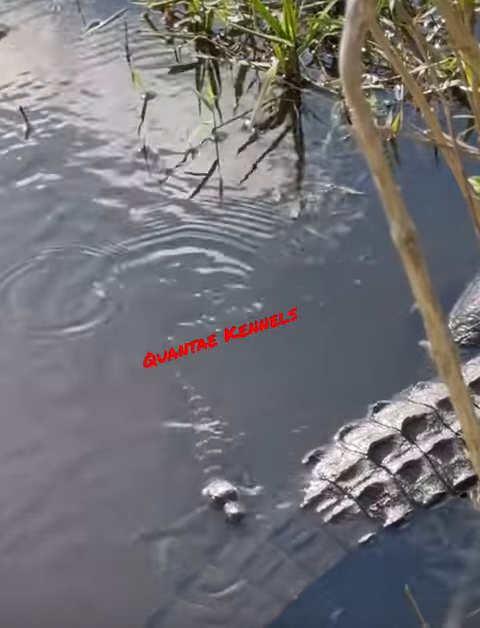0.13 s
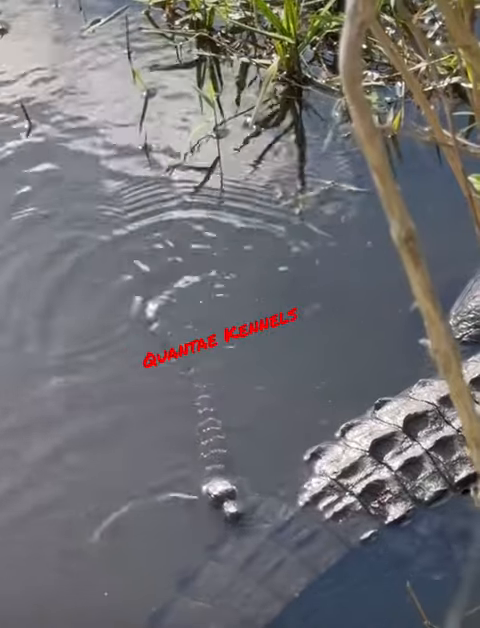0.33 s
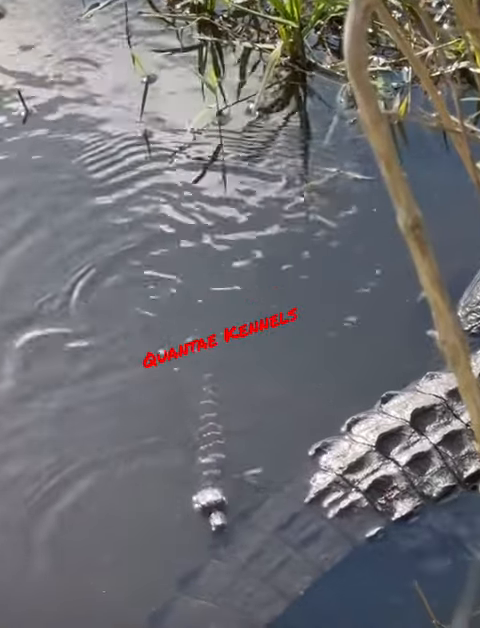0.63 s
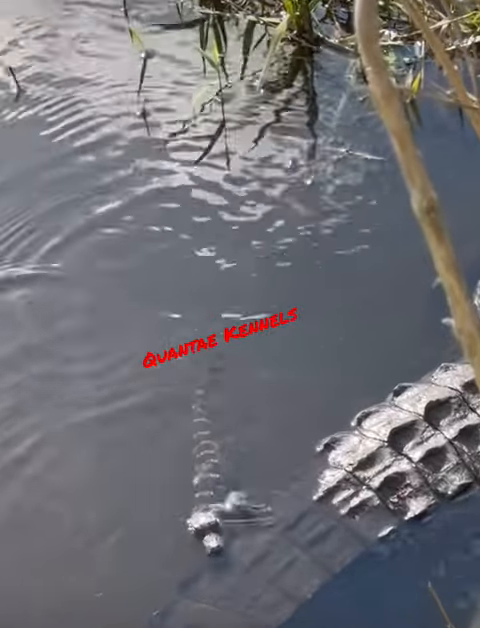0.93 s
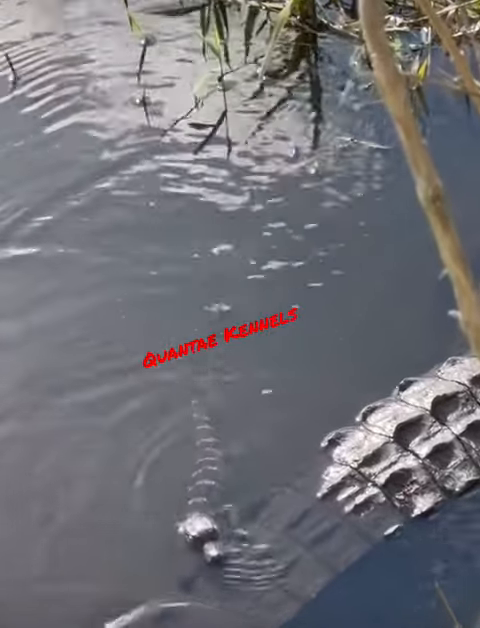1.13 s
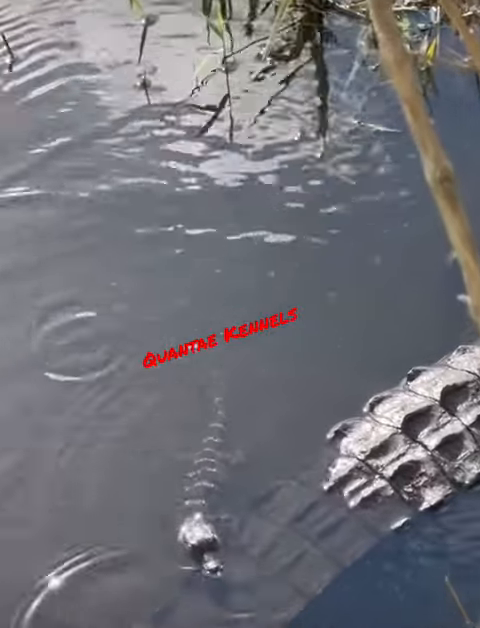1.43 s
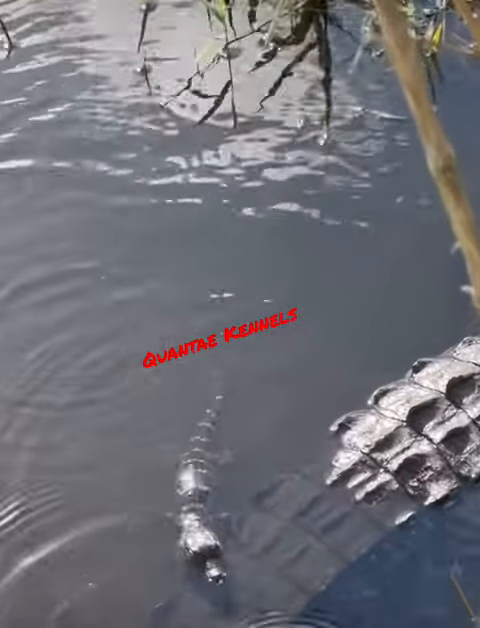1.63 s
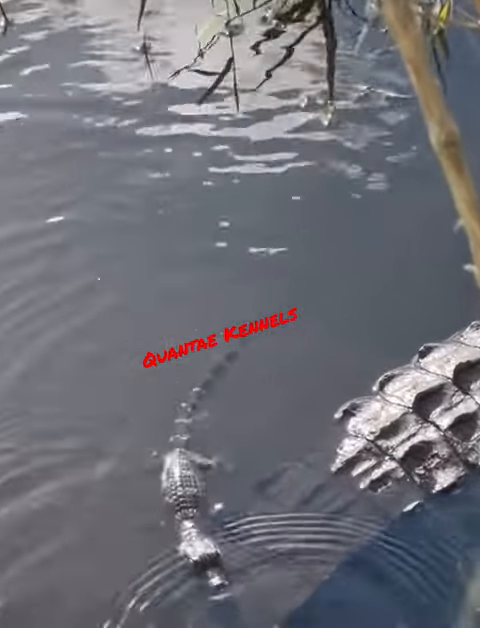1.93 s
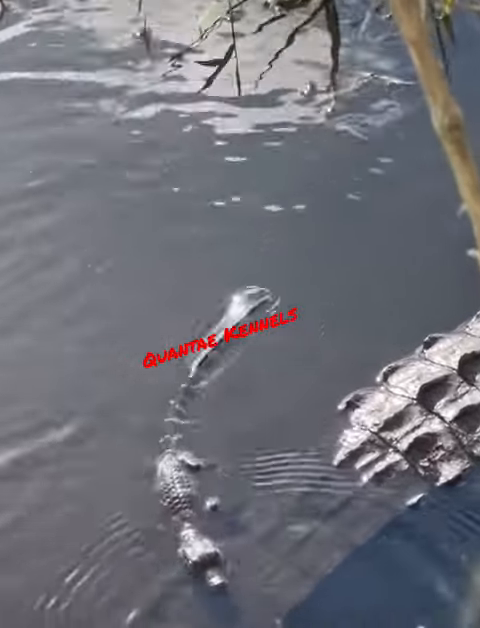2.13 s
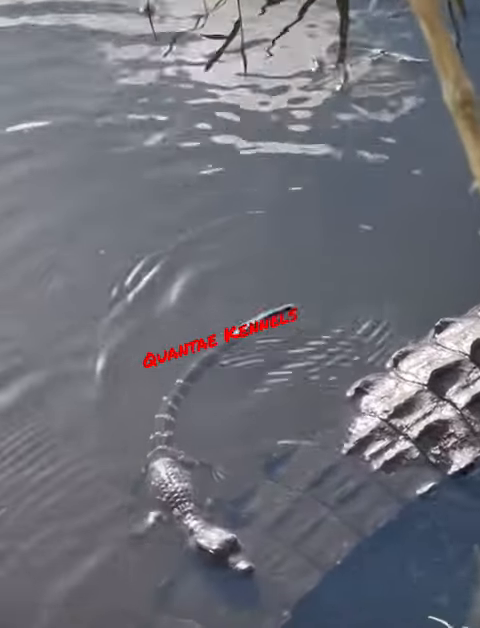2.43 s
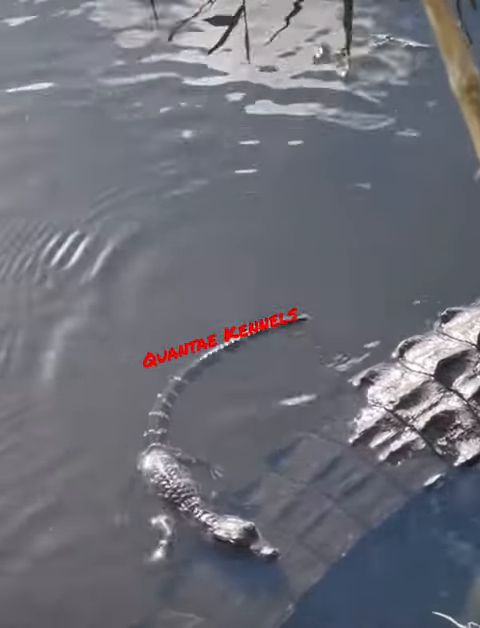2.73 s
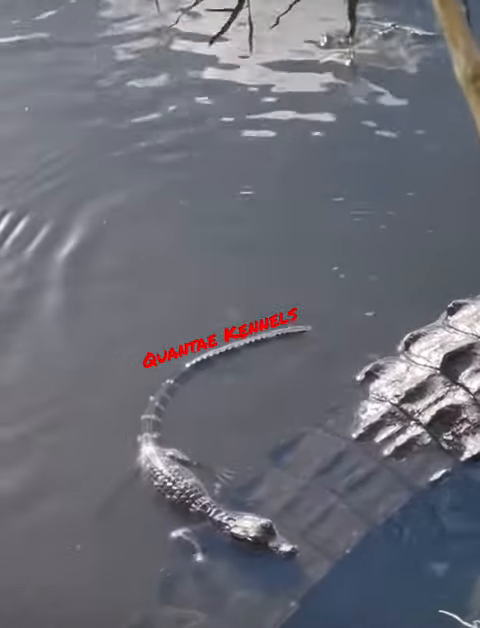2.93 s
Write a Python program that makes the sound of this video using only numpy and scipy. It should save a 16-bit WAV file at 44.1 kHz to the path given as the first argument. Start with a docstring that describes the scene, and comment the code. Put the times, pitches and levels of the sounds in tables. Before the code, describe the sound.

A deep steady rumble like far traffic or wind hangs over quiet pond water.

```python
"""Pond near a road

Deep steady rumble of far traffic and machinery (coloured noise) with a faint wavering motor hum (sines).
Drone, whirr and thin whine are narrow noise; water trickles and ticks close by (ringing bubbles, drips).
A small animal gives one short low peep, an insect a thin high squeak (gliding sines); thin high hiss on top.
A phone with two close microphone ports picks it up; the sound sets in after a short silence.
"""
import sys
import numpy as np
from scipy import signal
from scipy.fft import rfft, irfft
from scipy.io import wavfile

SR = 44100
rng = np.random.default_rng(int(sys.argv[2]) if len(sys.argv) > 2 else 0)


def undo_db(level):
    """Turn decibels back into plain size, where 20 dB means ten times bigger."""
    steps = np.asarray(level, float) / 20
    return 10 ** steps


def generate_wav(signal):
    """Clip the signal to [-1, 1] and save it as 16-bit WAV at the path in sys.argv[1]."""
    frames = np.transpose(np.atleast_2d(signal))
    scaled = np.clip(frames, -1, 1) * 32767
    pcm = np.round(scaled).astype(np.int16)
    wavfile.write(sys.argv[1], SR, pcm)


N = 136269


def rms_one(x):
    """Scale to rms 1."""
    return x / np.sqrt(np.mean(x ** 2) + 1e-20)


def in_time(rows):
    """Interpolate a (t/s, value) table at every sample."""
    t_s, value = np.transpose(rows)
    return np.interp(np.arange(N) / SR, t_s, value)


def drift(rate_hz):
    """Slow random signal, spread 1: noise through two equal poles, run at SR / 40."""
    pole = np.exp(-80 * np.pi * rate_hz / SR)
    noise = rng.standard_normal(N // 40 + 2002)
    slow = signal.lfilter([1], [1, -2 * pole, pole * pole], noise)[2000:]  # settled part
    return np.interp(np.arange(N) / 40, np.arange(len(slow)), rms_one(slow))


def ring(clicks, hz, t60_s):
    """Two-pole resonance: a unit click starts a decaying sine of height 1."""
    radius = undo_db(-60 / (t60_s * SR))
    angle = 2 * np.pi * hz / SR
    poles = [1, -2 * radius * np.cos(angle), radius * radius]
    return signal.lfilter([0, np.sin(angle)], poles, clicks + 1e-18)


def ring_twice(clicks, hz, t60_s):
    """Two equal resonances in series: softer onset, narrower band."""
    return ring(ring(clicks, hz, t60_s), hz, t60_s)


def coloured(spectrum, patchy_db):
    """Noise shaped by a spectrum, its half-octave bands flickering partly together; rms 1."""
    hz = np.maximum(np.arange(N // 2 + 1) * SR / N, 1)
    points_hz, points_db = np.transpose(spectrum)
    gain_db = np.interp(np.log(hz), np.log(points_hz), points_db)
    full = rfft(rng.standard_normal(N)) * undo_db(gain_db)
    place = 2 * np.log2(hz / 20)  # half octaves above 20 Hz
    together = drift(5.4)
    out = np.zeros(N)
    for k in range(21):
        share = np.clip(1 - abs(place - k), 0, 1)
        flicker_db = patchy_db * (1.05 * together + drift(21.0))
        out += irfft(full * share, N) * undo_db(flicker_db)
    return rms_one(out)


def narrow(hz, one_pass_width_hz):
    """Noise twice through one resonance; rms 1."""
    t60_s = np.log(1000) / (np.pi * one_pass_width_hz)
    return rms_one(ring_twice(rng.standard_normal(N), hz, t60_s))


def glides(rows):
    """Short sines of gliding pitch under a Hann swell."""
    out = np.zeros(N)
    for t_s, length_s, peak_db, start_hz, end_hz in rows:
        n, i = int(length_s * SR), int(t_s * SR)
        phase = 2 * np.pi * np.cumsum(np.linspace(start_hz, end_hz, n)) / SR
        out[i:i + n] += undo_db(peak_db) * np.hanning(n) * np.sin(phase)
    return out


# rumble spectrum, common to both ports: [f/Hz, relative density/dB]
RUMBLE_SPECTRUM = [(15, -50), (25, -25.5), (33, -21), (45, -3.5), (65, 1), (100, -2), (170, -4.5),
                   (230, -10), (330, -14), (439, -19), (528, -25), (620, -24.5), (700, -29.5),
                   (1140, -37.5), (1900, -49), (2600, -71.5), (4000, -82)]
# rumble rms ahead of the upper swell: [t/s, level/dB]
RUMBLE_LEVEL = [(0.1, -12), (0.48, -16.5), (0.7, -12.5), (1.2, -14.5), (1.26, -15.5), (1.32, -13),
                (2.98, -14), (3.05, -16)]
# extra gain of the rumble above the split: [t/s, level/dB]
UPPER_SWELL = [(0, -2), (.25, 0.5), (.5, 1.5), (.8, -1.5), (1.15, 1), (1.35, -1.5), (1.6, 0), (2.0, 1),
               (2.15, 1), (2.3, -1), (2.45, 0.5), (2.7, 0.5), (2.8, -0.5), (3.09, 1)]


def rumble():
    """Far traffic and machinery: coloured noise whose upper part swells on its own."""
    split_hz = 129
    noise = coloured(RUMBLE_SPECTRUM, patchy_db=.5)
    low = signal.sosfiltfilt(signal.butter(2, split_hz, fs=SR, output="sos"), noise)
    upper = noise - low
    return undo_db(in_time(RUMBLE_LEVEL)) * (low + undo_db(in_time(UPPER_SWELL)) * upper)


# low noise that differs between the ports: [f/Hz, relative density/dB]
APART_SPECTRUM = [(24, -20.5), (40, -8.5), (60, -3), (128, -11.5), (204, -3.5), (390, -4), (444, -5),
                  (548, -0.5), (1310, -17.5), (1540, -37), (1900, -59.5), (4180, -83)]


def rumble_apart():
    """Patchy low coloured noise, to be taken with opposite sign in the two ports."""
    level_db = -38
    return undo_db(level_db) * coloured(APART_SPECTRUM, patchy_db=2.0)


# motor harmonics: [multiple of the base pitch, rms level/dB ahead of waver and swell]
HUM_HARMONICS = [(2, -40.5), (4, -59), (5, -61), (6, -64), (7, -71), (8, -69)]
# common gain of the harmonics: [t/s, level/dB]
HUM_SWELL = [(0, 4.5), (.65, 4.5), (.8, -3), (1.05, 2), (1.15, -4), (1.6, -2), (2.0, -2), (2.2, -5),
             (2.35, 1), (2.48, 5), (2.65, 1), (2.77, -4), (2.85, 4), (2.92, -3), (3.09, 0)]


def hum():
    """Motor: multiples of one drifting pitch, each wavering in strength."""
    base_hz, pitch_spread_hz, waver_db = 293.8, .8, 2.5
    phase = 2 * np.pi * np.cumsum(base_hz + pitch_spread_hz * drift(3.05)) / SR
    out = np.zeros(N)
    for multiple, level_db in HUM_HARMONICS:
        height = np.sqrt(2) * undo_db(level_db + waver_db * drift(12.0))
        out += height * np.sin(round(multiple) * phase + rng.uniform(0, 2 * np.pi))
    return undo_db(in_time(HUM_SWELL)) * out


# passing drone: [t/s, level/dB]
DRONE_LEVEL = [(0, -19.5), (.6, -22.5), (.95, -24.5), (1.05, -34.5), (3.09, -31)]


def drone():
    """Passing drone: a narrow noise band of fixed pitch under a level curve."""
    return undo_db(in_time(DRONE_LEVEL)) * narrow(212.47, one_pass_width_hz=4.65)


# swelling whirr, common part: [t/s, level/dB]
WHIRR_LEVEL = [(0, -24.5), (.2, -43.5), (.6, -47), (.75, -26.5), (1.0, -56), (1.3, -27), (1.6, -46.5),
               (1.95, -27), (2.6, -29.5), (2.9, -54)]


def whirr():
    """Swelling band noise: a common part and an independent, weaker part that differs by port."""
    centre_hz, one_pass_width_hz, apart_db = 440, 90, -8
    gain = undo_db(in_time(WHIRR_LEVEL))
    common = gain * narrow(centre_hz, one_pass_width_hz)
    apart = undo_db(apart_db) * gain * narrow(centre_hz, one_pass_width_hz)
    return common, apart


# stir of the water; bubbles and wash scale its swing: [t/s, level/dB]
TRICKLE_STIR = [(0, -49), (.9, -49), (.97, -46.5), (1.05, -49), (1.3, -48), (1.4, -48.5), (1.55, -48.5),
                (1.7, -48.5), (1.9, -47.5), (2.0, -48), (2.1, -47.5), (2.45, -47), (2.65, -48), (2.72, -48),
                (2.82, -46), (2.9, -49), (3.0, -48.5), (3.09, -48.5)]
# two sizes of bubble: [low f/Hz, high f/Hz, relative level/dB]
BUBBLE_PITCHES = [(2400, 3700, 0), (3950, 5000, -6)]
# fine wash of water and air: [f/Hz, relative density/dB]
WASH_SPECTRUM = [(1200, -30.5), (2000, 6), (2700, -5.5), (3600, -14.5), (4500, -13), (6000, -8),
                 (7500, -12), (8200, -16.5), (9600, -14), (10500, -24.5), (11000, -48), (15400, -68)]


def trickle():
    """Tiny ringing bubbles at random over a fine wash; both grow as the water stirs."""
    bubbles_per_s, t60_cycles, patchy_db = 5000, 16, 3.0  # t60 of one of two resonances
    bubbles_under_db, bubbles_follow = -5, 2.5
    wash_db, wash_follows = -53.5, 0.55
    level_db = in_time(TRICKLE_STIR)
    mean_db = level_db.mean()
    stir_db = level_db - mean_db

    sizes = undo_db(2.2 * np.minimum(rng.exponential(1, N), 4)) * rng.choice([-1, 1], N)
    born = rng.random(N) < bubbles_per_s / SR
    pitches = [(hz, db) for low, high, db in BUBBLE_PITCHES for hz in np.geomspace(low, high, num=8)]
    dealt = rng.integers(0, 16, N)  # pitch index of each bubble
    rings = np.zeros(N)
    for k, (hz, db) in enumerate(pitches):
        voice = rms_one(ring_twice(sizes * born * (dealt == k), hz, t60_cycles / hz))
        rings += undo_db(db + patchy_db * drift(11)) * voice

    bubbles = undo_db(mean_db + bubbles_under_db + bubbles_follow * stir_db) * rms_one(rings)
    wash = undo_db(wash_db + wash_follows * stir_db) * coloured(WASH_SPECTRUM, patchy_db=.7)
    return bubbles + wash


# small drips: [t/s, nominal peak level/dB, f/Hz, t60/s]
DRIPS = [(.385, -59, 6500, .003), (.470, -47.5, 2620, .014), (.958, -49, 2700, .003),
         (.958, -59, 4800, .002), (1.895, -50, 2450, .005), (2.085, -56, 4300, .005),
         (2.610, -54, 4500, .008), (2.945, -57, 4900, .008)]


def drips():
    """Each drip is a short burst of random touches into one ringing pitch."""
    burst_s = .018
    n = int(burst_s * SR)
    out = np.zeros(N)
    touches = rng.standard_normal((len(DRIPS), 2000))
    for (t_s, level_db, hz, t60_s), burst in zip(DRIPS, touches):
        i = int(t_s * SR)
        build_up = np.sqrt(min(n / 4, t60_s * SR / 40))  # touches that add up in the ring
        clicks = np.zeros(N)
        clicks[i:i + n] = undo_db(level_db) * burst[:n] * np.hanning(n) / build_up
        out += ring(clicks, hz, t60_s)
    return out


# small animal: [t/s, length/s, peak level/dB, start f/Hz, end f/Hz]
PEEP = [(2.081, .04, -17, 435, 410)]


def peep():
    """One short low sine, falling slightly."""
    return glides(PEEP)


# insect, part that differs by port: [t/s, length/s, peak level/dB, start f/Hz, end f/Hz]
SQUEAK = [(2.348, .045, -63, 10650, 10450), (2.424, .008, -56, 10800, 11600)]


def squeak():
    """Two thin high glides; the common part is a weaker copy of the part that differs by port."""
    common_under_db = -8
    apart = glides(SQUEAK)
    return undo_db(common_under_db) * apart, apart


def whine():
    """Faint steady whine: a very narrow noise band."""
    level_db = -73
    return undo_db(level_db) * narrow(4469, one_pass_width_hz=10)


# thin high hiss at the very top: [f/Hz, relative density/dB]
THIN_HISS_SPECTRUM = [(13000, -40), (13500, -5), (14200, 0), (14450, -3), (14700, -14), (15300, -40)]
# its rms: [t/s, level/dB]
THIN_HISS_LEVEL = [(0, -89), (1.25, -87), (1.4, -79), (1.9, -79), (2.05, -86), (2.3, -77), (2.6, -78),
                   (3.09, -80)]


def thin_hiss():
    """High noise band under a level curve."""
    return undo_db(in_time(THIN_HISS_LEVEL)) * coloured(THIN_HISS_SPECTRUM, patchy_db=3.0)


# microphone hiss: [f/Hz, relative density/dB]
HISS_SPECTRUM = [(4600, -47), (5200, -18), (6250, -4.5), (7350, -3), (8670, -5), (9200, -4), (9550, 1.5),
                 (10100, -4), (11800, -1), (13200, 0), (14300, -4), (15100, -9), (15300, -60)]


def hiss():
    """Microphone hiss, to be taken with opposite sign in the two ports."""
    level_db = -59.5
    return undo_db(level_db) * coloured(HISS_SPECTRUM, patchy_db=1.2)


# port imbalance: [f/Hz, left minus right level/dB, left lead/rad]
PORTS = [(140, 0, 0), (250, 0.7, 0.15), (500, 1.6, .2), (650, 0, .25), (900, -4, .3), (1250, -1, .3),
         (1600, 0, 0)]


def lean(mid):
    """Side signal that gives the common sound a left/right ratio in level and phase by pitch."""
    points_hz, points_db, points_lead_rad = np.transpose(PORTS)
    hz = np.arange(N // 2 + 1) * SR / N
    level_db = np.interp(hz, points_hz, points_db)
    lead_rad = np.interp(hz, points_hz, points_lead_rad)
    ratio = undo_db(level_db) * np.exp(1j * lead_rad)
    return irfft(rfft(mid) * (ratio - 1) / (ratio + 1), N)


def scene():
    """What both ports share, plus and minus what differs."""
    whirr_common, whirr_apart = whirr()
    squeak_common, squeak_apart = squeak()
    mid = rumble() + hum() + drone() + whirr_common
    mid += trickle() + drips() + peep() + squeak_common
    mid += whine() + thin_hiss()
    side = rumble_apart() + whirr_apart + squeak_apart + hiss() + lean(mid)
    return np.array([mid + side, mid - side])


def top_cut(x):
    """Nothing passes above the cut-off."""
    return signal.sosfilt(signal.butter(12, 16510, fs=SR, output="sos"), x)


def record(dry):
    """Soft-limited peaks, steep low-pass, silence until the start."""
    top_hz, start_s = 15100, .0363
    soft = 1.5 * np.tanh(dry / 1.5)
    low_pass = signal.ellip(10, .5, 60, top_hz, fs=SR, output="sos")  # ripple, stop depth in dB
    cut = signal.sosfilt(low_pass, soft)
    started = np.arange(N) >= start_s * SR
    return top_cut(cut * started)


dry = scene()
out = record(dry)
generate_wav(out)
```